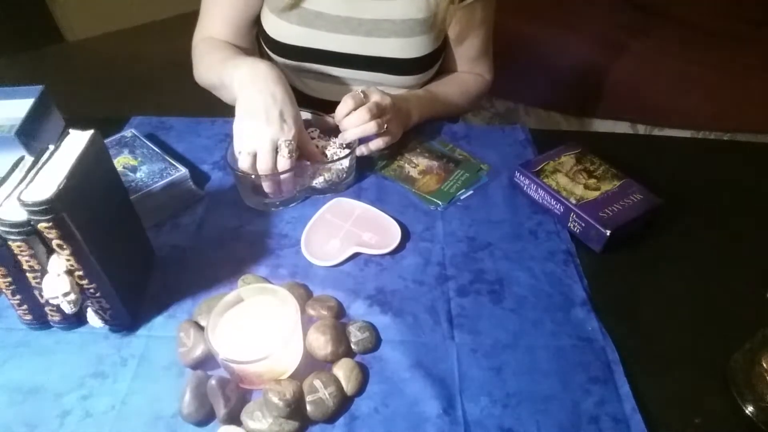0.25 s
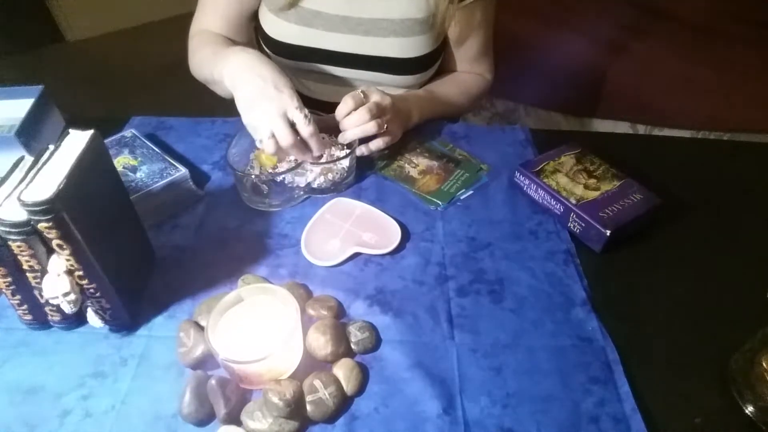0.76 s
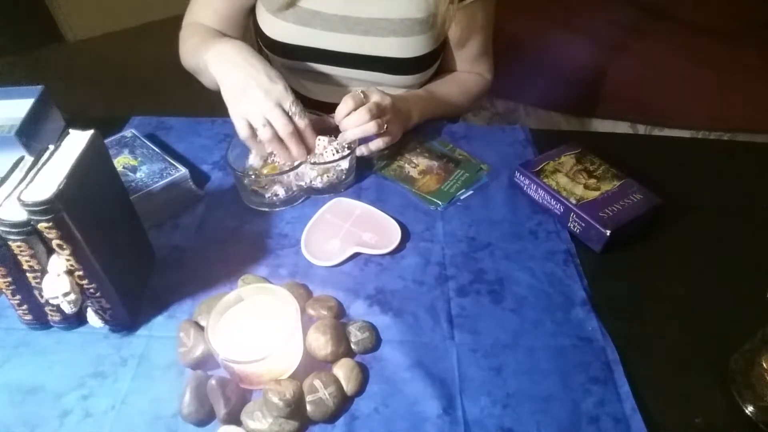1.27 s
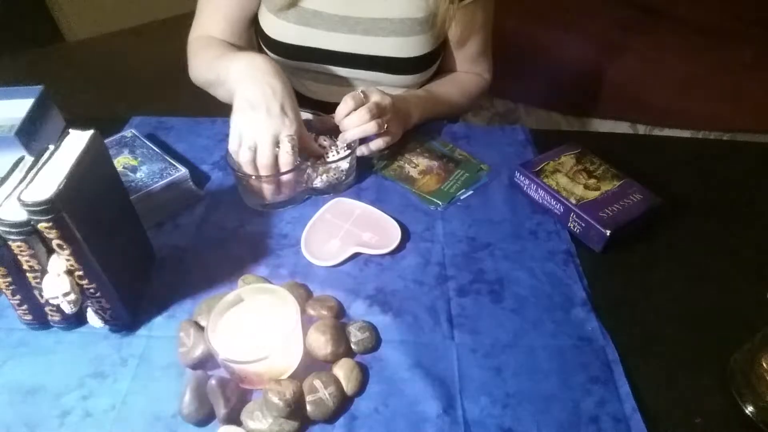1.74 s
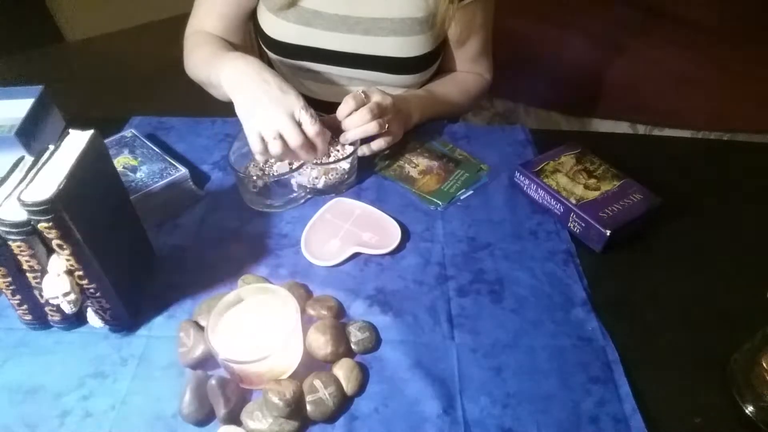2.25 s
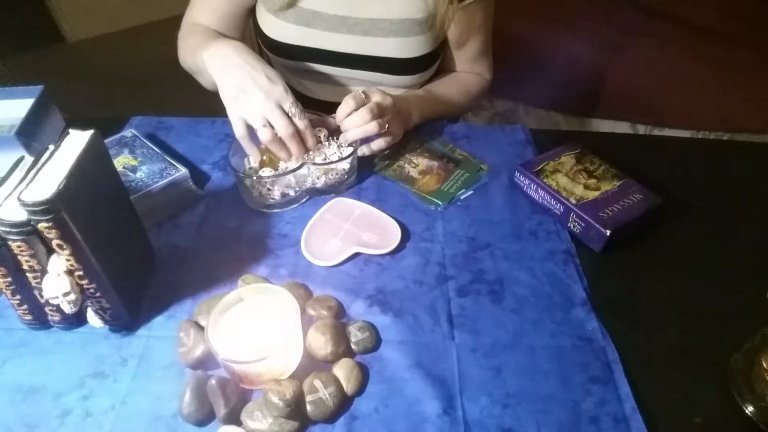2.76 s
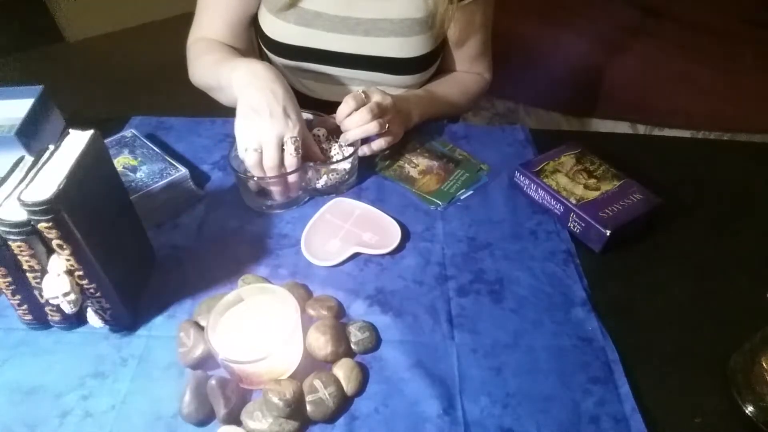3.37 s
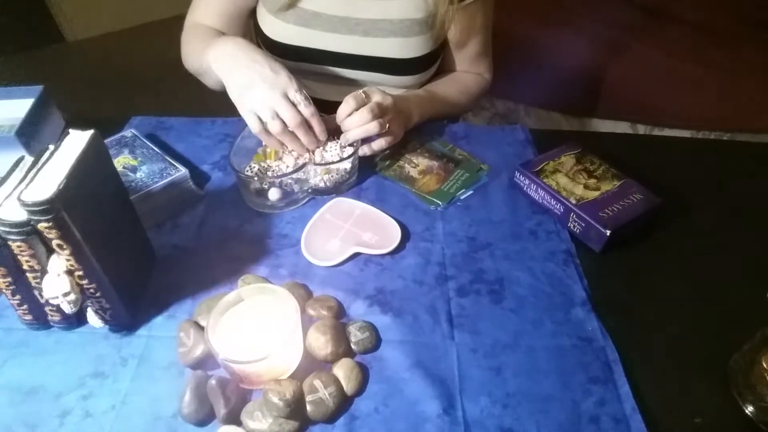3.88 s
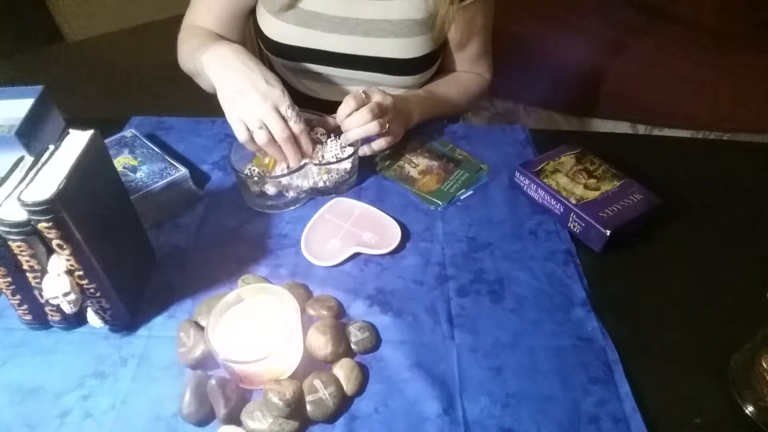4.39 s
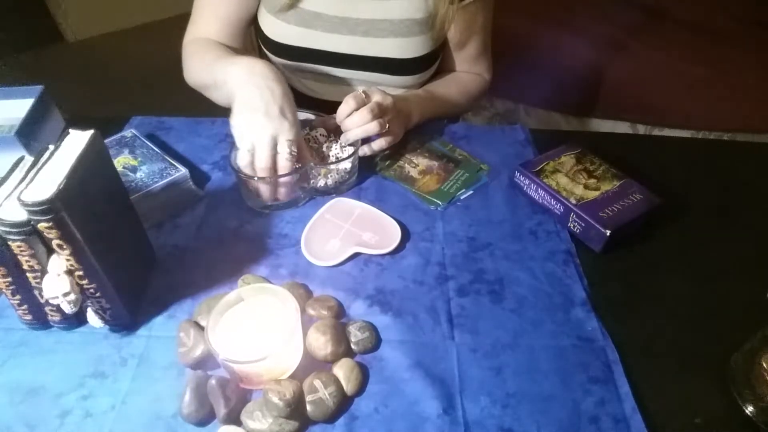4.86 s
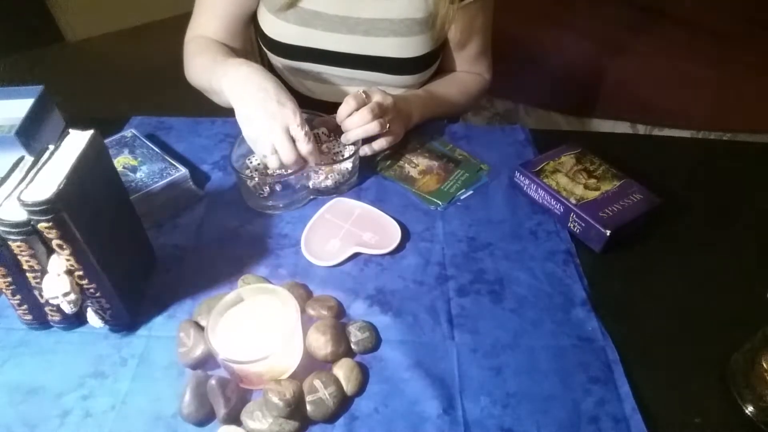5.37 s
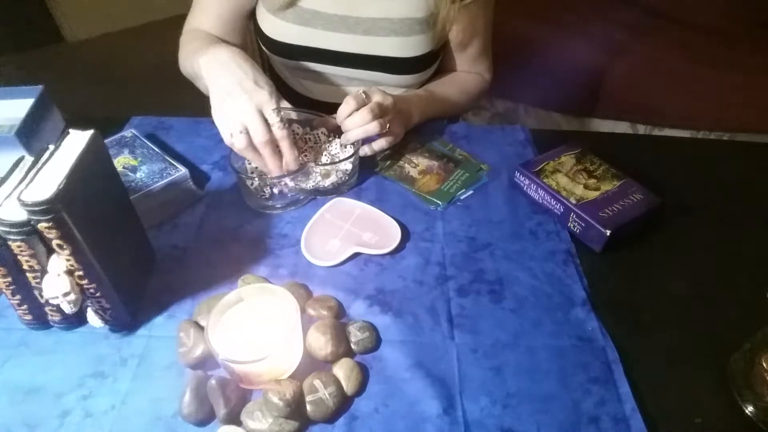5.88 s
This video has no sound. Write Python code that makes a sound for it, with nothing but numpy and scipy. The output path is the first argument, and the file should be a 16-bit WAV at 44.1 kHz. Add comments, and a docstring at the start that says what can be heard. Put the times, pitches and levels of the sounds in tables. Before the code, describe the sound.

In a small quiet room, a hand stirs small metal charms and beads in a glass bowl on a cloth-covered table, heard close in stereo. From the start, a bright, grainy rattle swells and dips with quick finger shoves, full of ticks and light glassy tinks. Harder clinks crack at about 0.3, 0.4 and 0.9 seconds, then at 1.6, just before a short lull near 1.7. Stirring resumes, busy from 2.3 to 3.0 with clustered knocks and low soft bumps of the bowl. It is lighter from 3.2 to 4.1, then brief high squeaks come near 4.2, with strong knocks at 4.3 and 4.5 and a heavy thud. After a thinner moment around 4.7 to 5.1, a sharp clink and thump land at 5.5, and rattling continues to the end just past 6. Rings are short; reflections are dense and the room hush very faint.

```python
"""A small room, a cloth-covered table: a hand stirs small metal charms and beads round a glass bowl.
Two microphones hear tiny contacts fizz, as random clicks ringing the modes of glass and table; loose charms tick
with pitches of their own, beads tink and single charms snap free. Larger pieces knock on the wall, noise cracks
that leave decaying sines; the bowl bumps on the table; metal edges squeak on the glass, as unsteady tones.
Dense reflections and a low hush of filtered noise make the room."""
import sys
import numpy as np
from scipy import signal
from scipy.fft import rfft, irfft, next_fast_len
from scipy.io import wavfile
from scipy.ndimage import uniform_filter1d

SR = 44100
rng = np.random.default_rng(int(sys.argv[2]) if len(sys.argv) > 2 else 0)


def log_audio(samples):
    """Write samples as a 16-bit WAV file to the path given in sys.argv[1]."""
    # one column per channel
    frames = np.atleast_2d(samples).T
    # limit to full scale, then quantise
    limited = np.clip(frames, -1, 1)
    pcm = np.round(limited * 32767).astype(np.int16)
    wavfile.write(sys.argv[1], SR, pcm)


N = 270377  # length [samples]
TAPS = 8192  # length of a response [samples]
HZ = np.fft.rfftfreq(TAPS, 1 / SR)
SIDES = np.array([[.5], [-.5]])  # share of a left-minus-right difference at each microphone
FULL_EFFORT_DB = -26  # reference level at which the hand's effort counts as full

# modes of the glass bowl, nominal:
# (frequency [Hz], width [Hz], height over the dry click [dB], left minus right [dB])
BOWL_MODES = [(1003.4, 34, 16, 0.5), (1127, 50, 12, 10), (1776, 97, 20, -8.5), (1905, 77, 13, -5.5),
              (2434, 360, 10, -2), (2993, 66, 12.5, -1), (3418, 99, 7, 13.5), (3825, 110, 7, -7),
              (4027, 32, 6, -18), (4700, 86, -3, 23), (5220, 81, 4.5, -3), (6020, 103, 2.5, 5),
              (6850, 190, 2.5, -1), (7365, 75, 8.5, -13.5), (7830, 123, 8.5, 8.5), (8800, 150, 4, 7),
              (9210, 31, 4.5, -21), (9600, 58, 5.5, -9), (10930, 340, 12, 7), (11750, 160, 5, -6.5),
              (12340, 340, 15.5, 17)]
# modes of the table under the bowl:
# (frequency [Hz], width [Hz], height over the dry click [dB], left minus right [dB])
TABLE_MODES = [(140, 14, 12, -2.5), (203, 24.4, 11, -13), (228.5, 15.4, 12.5, 5.5), (291.6, 22, 15.5, -10),
               (394.2, 5.6, 18.5, 3), (503.3, 48.5, 12.5, 0.5)]
# lasting ring of the glass, nominal: (frequency [Hz], t60 [s], then the relative level [dB] when struck
# at the end, at the side, at the corner, at the base, at the rim)
GLASS_RING = [(1717, 0.085, -6.5, -30, -34, -5.5, -30), (2945, 0.058, -11, -3.5, -5, -7.5, -3.5),
              (3340, 0.069, 0, -32, -32, -11, -10), (3583, 0.043, 2.5, -35, -25, -11.5, -8),
              (3980, 0.037, -23, -29, -10, 1.5, -0.5), (4983, 0.082, -14, -3.5, 2, -30, -5.5),
              (5230, 0.054, 1.5, -7.5, -8, -3.5, -11), (6030, 0.08, -7, -11.5, -2.5, -10, -15),
              (6840, 0.064, -8, -2, -24, -28, 0.5), (7260, 0.036, -9.5, -11, -18, -31, 2),
              (7700, 0.072, -2, -30, -5, -24, 1.5), (8830, 0.084, -30, -30, -5, -26, -9),
              (9820, 0.21, -15, -23, -19, -22, -7), (10890, 0.048, -7.5, -30, -26, -28, -14)]
# balance of the two microphones: (frequency [Hz], left minus right [dB]); single charms take half of it
MIC_BALANCE = [(50, 1.5), (150, -4.5), (300, 1), (900, -9.5), (1800, 0), (2800, -1.5), (5000, 2), (7200, 3),
               (8500, -8.5), (10200, -9), (13000, -22), (16000, 2.5)]


def amp(db):
    """Gain for a level in dB."""
    return 10 ** (np.asarray(db) / 20)


def evened(x):
    """The same signal at unit RMS level."""
    return x / np.sqrt(np.mean(x ** 2) + 1e-20)


def read(points, hz):
    """Value of a curve at hz, interpolated along a logarithmic frequency axis."""
    f, value = np.transpose(points)
    return np.interp(np.log(hz + 1), np.log(f + 1), value)


def add(mix, s, sound):
    """Lay a sound into the mix at s seconds."""
    part = mix[:, max(round(s * SR), 0):][:, :sound.shape[-1]]
    part += sound[..., :part.shape[1]]


def through(x, response):
    """Sound x as heard through an impulse response at each microphone."""
    return signal.oaconvolve(np.atleast_2d(x), response, axes=1)[:, :N]


def wander(size, hz):
    """Smooth chance of unit size, whose changes fade out above about hz times a second."""
    f = np.fft.rfftfreq(size, 1 / SR)
    return evened(irfft(rfft(rng.standard_normal(size)) / (1 + (f / hz) ** 4), size))


def contacts(per_s, spread_db):
    """Random clicks of either sign; a positive spread makes many small and a few large."""
    size = amp(spread_db * np.minimum(rng.exponential(1, N), 4))
    happens = rng.random(N) < per_s / SR
    return evened(size * rng.choice([-1, 1], N) * happens)


def bump(hz, octaves):
    """A smooth hill of height 1 on the frequency axis."""
    return np.exp(-(np.log2((HZ + 1) / hz) / octaves) ** 2)


def tint(size=170):
    """The uneven colour that one cluster or charm sends to each microphone, of unit spread."""
    ripple = rng.standard_normal((2, len(HZ)))
    smoother = uniform_filter1d(ripple, size, mode="wrap")
    return evened(uniform_filter1d(smoother, size // 2, mode="wrap"))


def hollows(hz):
    """Gain in dB of the bowl as a radiator: between its modes it passes less sound."""
    # (frequency [Hz], width [Hz], depth [dB])
    mode_gaps = [(2230, 420, -2.5), (4250, 180, -2.5), (5650, 280, -1.5), (6360, 220, -2)]
    return sum(db / (1 + (2 * (hz - f) / width) ** 2) for f, width, db in mode_gaps)


def body(colour, modes, extra_db=0., unlike_db=0., detune=0.):
    """Causal stereo response of unit energy: a dry click with resonances that vary with spot struck and load."""
    spot_db = unlike_db * rng.uniform(-1, 1, (len(modes), 2, 1))
    shifts = 1 + detune * rng.uniform(-0.85, 1, len(modes))
    power = 1
    for (f, width, db, lean), spot, shift in zip(modes, spot_db, shifts):
        power = power + amp(db + spot + lean * SIDES) ** 2 / (1 + (2 * (HZ - f * shift) / width) ** 2)
    colour_db = read(colour, HZ) + read(MIC_BALANCE, HZ) * SIDES + hollows(HZ) + extra_db
    log_gain = np.log(np.sqrt(power) * amp(colour_db))
    # minimum phase: the Hilbert transform of the log gain gives the phase of a causal response
    circle = np.concatenate([log_gain, log_gain[:, -2:0:-1]], axis=1)
    response = np.fft.ifft(np.exp(np.conj(signal.hilbert(circle)))).real[:, :TAPS // 2]
    return response / np.sqrt(np.sum(response ** 2) / 2)


def rebounds(gap_s, keep, contact_s, count=5):
    """One blow and its ever weaker, mostly quicker rebounds, each a brief noisy crack; unit energy."""
    t = np.arange(TAPS // 4) / SR
    waits = gap_s * .8 ** np.arange(count) * rng.uniform(.6, 1.4, count)
    shape = np.zeros(len(t))
    for k, s in enumerate(np.cumsum(waits) - waits):
        shape += np.clip(keep, 0, .9) ** k * (t >= s) * np.exp(-abs(t - s) / contact_s)
    noise = rng.standard_normal(len(t)) + .5 * rng.standard_normal((2, len(t)))
    cracks = shape * noise
    return cracks / np.linalg.norm(cracks, axis=1, keepdims=True)


def ping(hz, t60):
    """One small charm struck: two inharmonic partials, quickly damped."""
    t = np.arange(TAPS // 4) / SR
    overtone_hz = hz * rng.uniform(1.15, 1.7)
    tone = 0
    for f, db in ((hz, 0), (overtone_hz, -4)):
        level = amp(db - 60 * t / t60 + read(MIC_BALANCE, f) * SIDES / 2)
        tone = tone + level * np.sin(2 * np.pi * (f * t + SIDES * rng.uniform(-.6, .6)))
    return tone


def ring(modes, rise_s=0.003):
    """The glass rings on after a blow; each mode reaches the microphones with its own phase."""
    t = np.arange(TAPS) / SR
    tones = 0
    for hz, t60, db in modes:
        level = amp(db - 60 * t / t60 + read(MIC_BALANCE, hz) * SIDES)
        cycles = hz * t + rng.random() + SIDES * rng.uniform(-.3, .3)
        tones = tones + level * np.sin(2 * np.pi * cycles)
    return np.minimum(t / rise_s, 1) * tones


def stroke(start, length, rise_s, settle_db_per_s, sag_db_per_s=0):
    """Gain of one movement: the charms get going, keep moving while pushed, then settle."""
    t = np.maximum(np.arange(N) / SR - start, 0)
    fall_db = sag_db_per_s * t + settle_db_per_s * np.maximum(t - length, 0)
    return np.minimum(t / rise_s, 1) * amp(-fall_db)


def hand(follow=1, scraping=0, bearing=0):
    """Gain over time of a layer that follows the hand's effort, scraping and bearing down by the given amounts."""
    # sweeps round the bowl, with a short rest between them: (start [s], length [s], relative level [dB])
    sweep_list = [(-.1, 0.086, -36), (0.07, 1.582, -43), (1.719, 1.34, -41.5), (3.309, 0.66, -40.5),
                  (4.041, 0.626, -46), (4.808, 1.19, -43)]
    # fingers shoving the heap during a sweep: (start [s], length [s], relative level [dB],
    # scraping on the glass [dB, scaled by scraping], bearing down on the table [dB, scaled by bearing])
    shove_list = [(0.168, 0.11, -33, -1.5, 2), (0.327, 0.11, -32, -0.5, -4.5), (0.475, 0.11, -38.5, 1, 1.5),
                  (0.65, 0.023, -41, -18, -18), (0.754, 0.17, -33, -1.5, 0.5), (0.88, 0.094, -34.5, 1, 2.5),
                  (0.978, 0.15, -39, 0.5, -15), (1.185, 0.063, -34, 0.5, -2),
                  (1.283, 0.23, -30.5, -1.5, -3), (1.752, 0.11, -35, 0, 0.5), (1.93, 0.1, -37, 0.5, -1.5),
                  (2.05, 0.055, -30.5, -0.5, -4.5), (2.13, 0.19, -36.5, -2, -9),
                  (2.383, 0.17, -33.5, -3, 2), (2.729, 0.22, -31, 0, -2.5), (2.883, 0.16, -30, -1.5, -0.5),
                  (3.074, 0.046, -37, -0.5, 1), (3.378, 0.22, -36.5, -1.5, -6),
                  (3.537, 0.18, -33.5, 0.5, -9), (3.747, 0.14, -37, -3, 0), (3.964, 0.034, -41, 1, -1),
                  (4.148, 0.097, -40.5, -0.5, -11), (4.286, 0.32, -37, -0.5, -0.5),
                  (4.425, 0.07, -31, -1, 2), (4.487, 0.14, -38.5, 0.5, 7), (4.821, 0.025, -52, 4.5, 14.5),
                  (4.897, 0.071, -36.5, -1, 1), (5.14, 0.025, -39.5, 2.5, 3.5),
                  (5.257, 0.16, -36.5, -5, -7), (5.496, 0.15, -34, -1, 6.5),
                  (5.77, 0.12, -33.5, -0.5, -1.5), (6.008, 0.15, -31.5, -2.5, -3)]
    moves = []
    for s, length, db in sweep_list:
        moves.append(amp(db - FULL_EFFORT_DB) * stroke(s, length, rise_s=0.093, settle_db_per_s=350))
    for s, length, db, scrape_db, down_db in shove_list:
        shape = stroke(s, length, rise_s=0.017, settle_db_per_s=225, sag_db_per_s=9.5)
        moves.append(amp(db - FULL_EFFORT_DB + scraping * scrape_db + bearing * down_db) * shape)
    return amp(FULL_EFFORT_DB) * np.linalg.norm(moves, axis=0) ** follow


def hush(level_db=-56, apart=0.065):
    """The low, steady air of the room: coloured noise, almost the same at both microphones."""
    # (frequency [Hz], relative level per Hz [dB])
    air_colour = [(15, -36), (50, -3), (90, -16.5), (130, 2.5), (250, -83), (600, -30), (2000, -32),
                  (8000, -67), (16000, -58)]
    hz = np.fft.rfftfreq(N, 1 / SR)
    noise = rng.standard_normal(N) + apart * rng.standard_normal((2, N))
    gain = amp(read(air_colour, hz) + read(MIC_BALANCE, hz) * SIDES)
    return amp(level_db) * evened(irfft(rfft(noise) * gain, N))


def heap(count=10):
    """Clusters across the bowl slip in turn, each with its own colour and path; together they shake the table."""
    # dry contacts sliding, pressed on the glass, and pushed on the table:
    # (frequency [Hz], relative level per Hz [dB])
    slide_colour = [(1500, -102), (4000, 10.5), (7000, 17.5), (8500, 13), (10200, 3.5), (12500, 2.5),
                    (14800, 21.5), (15700, 13.5)]
    press_colour = [(350, -46), (750, -13), (1050, -9.5), (1400, -14), (2200, -14), (3000, -4),
                    (4300, -7.5), (4900, 1.5), (6200, 1.5), (7200, 1.5), (8400, -8), (11000, -16),
                    (16000, -26)]
    push_colour = [(30, -20.5), (60, -5), (100, -9), (135, -4), (240, -3.5), (340, -4.5), (450, -6),
                   (620, -8), (800, -19.5), (1100, -15), (1800, -29.5), (5000, -76)]
    slips, out = wander(N, hz=45), np.zeros((2, N))
    avalanche = amp(1.1 * slips)
    sliding = hand() * avalanche * amp(0.3)
    pressing = hand(follow=0.96, scraping=3.4) * avalanche * amp(-3.5)
    for lag in np.arange(count) % 5 - 2:
        turn = evened(amp(5 * wander(next_fast_len(N), hz=22)[:N])) / np.sqrt(count)
        slide = contacts(per_s=420, spread_db=2.6) * sliding * turn
        press = contacts(per_s=130, spread_db=2.4) * pressing * turn
        for taps, colour in (slide, slide_colour), (press, press_colour):
            glass = body(colour, BOWL_MODES, extra_db=2 * tint(), unlike_db=5, detune=.016)
            # the lag between the microphones, in samples, places the cluster
            out += through([np.roll(taps, lag), taps], glass)
    bearing_down = hand(follow=0.69, scraping=0.56, bearing=0.98)
    push = contacts(per_s=450, spread_db=-2.5) * bearing_down * avalanche * amp(-8.5)
    # the push also stirs the lowest modes of the glass
    return out + through(push, body(push_colour, TABLE_MODES + BOWL_MODES[:4]))


def charms(per_s=230, low_hz=3200, high_hz=13000, level_db=-5.0, count=48):
    """Loose charms tumble, more often and harder as the hand pushes; each has its own tick, rebound and
    pitch, quickly damped by its neighbours."""
    # (frequency [Hz], relative level per Hz [dB])
    tick_colour = [(300, -40), (2000, -24), (4000, 3), (7000, -14), (9000, 8), (12000, -0.5), (15000, 3)]
    out, owner = np.zeros((2, N)), rng.integers(0, count, N)
    effort = hand(scraping=0.67) / amp(FULL_EFFORT_DB)
    hits = contacts(per_s * effort, spread_db=3.2) * np.sqrt(effort)
    for k in range(count):
        hz = low_hz * (high_hz / low_hz) ** ((k + rng.random()) / count)
        tone = ping(hz, rng.uniform(.012, .045))
        blow = rebounds(gap_s=.004, keep=.45, contact_s=.0003)
        tick = through(blow, body(tick_colour, BOWL_MODES, extra_db=3 * tint(), unlike_db=7))
        dry_part = tick[:, :tone.shape[1]] / np.linalg.norm(tick)
        pitched_part = amp(hollows(hz)) * tone / np.linalg.norm(tone)
        out += through(hits * (owner == k), dry_part + pitched_part)
    return evened(out) * np.sqrt(np.mean(effort ** 2)) * amp(FULL_EFFORT_DB + level_db)


def tinks(per_s=55, level_db=-9.5, count=20):
    """Beads touch the wall lightly, each at a spot that picks out a few of the glass's modes."""
    out, spot = np.zeros((2, N)), rng.integers(0, count, N)
    hits = contacts(per_s, spread_db=2.6)
    for k in range(count):
        modes = []
        for hz, t60, *_ in GLASS_RING[1:-3]:
            # slightly detuned, shorter than after a knock
            modes.append((hz * rng.uniform(.988, 1.012), .7 * t60, rng.uniform(-30, 0)))
        out += through(hits * (spot == k), evened(ring(modes, rise_s=.0002)))
    return evened(out) * hand(scraping=2.0) * amp(level_db)


def bumps(level_db=27, hollow_hz=515, hollow_width_hz=30, hollow_height_db=11):
    """The shifting heap rocks the bowl, which thuds through the cloth into the table and sounds its lowest modes."""
    # (time [s], relative level [dB], hollow middle tone [dB, halved for its resonance])
    bump_list = [(0.098, -47, 9), (0.159, -35, 7), (0.201, -33, 2), (0.228, -36, 5), (.262, -42, -6),
                 (0.515, -44, 12), (0.584, -45, 7), (0.797, -40, -16), (0.844, -39, -4), (0.887, -42, 4),
                 (0.932, -33, 5), (.955, -41, -2), (1.202, -47, 2), (1.322, -35.5, -14), (1.482, -44, 15),
                 (1.797, -37, -6), (2.072, -46, -12), (2.321, -37.5, -11), (2.401, -37, -11),
                 (2.433, -40, -9), (2.513, -41, 2), (2.631, -38, -8), (2.66, -40, -9), (2.755, -32, -10),
                 (2.782, -37.5, -8), (2.909, -37.5, -2), (2.941, -41, -3), (3.015, -41, 20),
                 (3.093, -40, -9), (3.297, -40, -2), (3.361, -39, 8), (3.42, -35.5, -4), (3.673, -40, 3),
                 (3.892, -43, -17), (3.93, -42.5, -4), (4.311, -38.5, -31), (4.52, -30.5, 1),
                 (4.534, -28, -3), (4.592, -49, 2), (4.777, -45, 2), (4.804, -43.5, -2), (4.834, -38.5, 15),
                 (4.888, -55, -3), (4.949, -41.5, -1), (5.228, -46, -2), (5.516, -30.5, -4),
                 (5.562, -28, -15), (5.631, -40, 7), (5.747, -37.5, -15), (6.075, -44, -15)]
    # (frequency [Hz], relative level per Hz [dB])
    thud_colour = [(40, -34), (105, -4), (135, 1), (170, -2.5), (240, -1), (330, -3.5), (550, -4.5),
                   (750, -15.5), (1000, -10.5), (1400, -17), (2500, -59.5)]
    out = np.zeros((2, N))
    for s, db, hollow_db in bump_list:
        hollow_mode = (hollow_hz, hollow_width_hz, hollow_height_db + hollow_db / 2, 0)
        modes = TABLE_MODES + BOWL_MODES[:2] + [hollow_mode]
        thud = body(thud_colour, modes, hollow_db * bump(hollow_hz, octaves=0.46))
        add(out, s, amp(db + level_db) * thud)
    return out


def knocks(piece_db=19, piece_width_hz=190, clink_db=7.5, ring_db=-18.0, clack_hz=1780):
    """A larger piece cracks against the wall and rebounds; the spot struck decides which modes ring on."""
    # (time [s], relative level [dB], spot struck, low clack of the glass [dB], treble [dB], relative ring [dB])
    knock_list = [(0.0984, -23.5, "base", 15, 13, -10), (0.1984, -16, "rim", -3, 0, -12),
                  (0.273, -9, "rim", 4, 12, -9), (0.4166, -5, "end", 3, 10, 1.5),
                  (0.4515, -16, "rim", -12, 16, -5), (0.5166, -12.5, "side", 0, -5, -10),
                  (0.625, -16, "end", 6, 6, 1), (0.932, -3.5, "side", -8, -29, 5),
                  (0.9343, -17, "rim", -10, -12, -9), (0.949, -11, "corner", -8, -15, -3),
                  (1.103, -14.5, "rim", 1, 14, -4), (1.2018, -21, "end", 6, 5, 4.5),
                  (1.531, -15, "side", -7, -3, 0), (1.5833, -11.5, "base", -0.5, -13, -13),
                  (1.6053, -2, "corner", -18, -2, -4.5), (1.6203, -11, "corner", -14, -6, -6),
                  (2.284, -9.5, "rim", -10, 14, -6.5), (2.3994, -12, "base", 3, -10, -1),
                  (2.4061, -7.5, "base", -2, -9, 1), (2.5283, -14, "base", -4, -28, -1.5),
                  (2.5563, -12, "corner", -13, -7, -7), (2.5881, -17.5, "base", 2.5, 0, 4.5),
                  (2.6582, -11.5, "base", 7, -16, -9), (2.701, -19.5, "base", 14, -13, 3),
                  (2.75, -12, "end", 11, 7, 3), (2.763, -6, "corner", 7, 11, -5),
                  (2.9096, -10, "corner", 5.5, -12, -1), (2.916, -11, "side", 5, -8, -4),
                  (3.1103, -12.5, "base", -6.5, 3, -14), (3.2971, -20, "base", 8, 0, -3),
                  (3.362, -22, "base", 7, 4, -11), (3.628, -17, "base", 5, 3, 3),
                  (3.643, -21, "corner", -6, 2, 1), (3.7175, -17.5, "side", 12, -2, -9),
                  (3.894, -15.5, "base", 8, 5, 8), (3.903, -15, "end", 10, -10, 2),
                  (4.159, -20, "base", 3, 9, 1), (4.201, -17.5, "rim", 0, 10, -2),
                  (4.2254, -14, "end", 3, 5, -5.5), (4.297, -4, "end", -7, 7, -0.5),
                  (4.5184, -4, "side", -1, -28, 6), (4.523, -16, "corner", -1, -20, -5),
                  (4.777, -19.5, "base", 4, -16, 0), (4.8041, -17.5, "base", 1, -4.5, -3),
                  (4.8383, -25, "end", 20, -2, 5), (5.2297, -13.5, "rim", -11, 2, -2),
                  (5.516, -3.5, "rim", 3, 6, -12), (5.6331, -16, "rim", 2, 6, -3),
                  (5.7318, -22, "base", 13, -3, -5), (5.8185, -17, "base", 20, 14, -13),
                  (5.8565, -13.5, "end", 9, -1, -7.5), (6.1042, -13.5, "rim", -5, -6, 8)]
    # spots on the bowl, in the order of the ring levels: (name)
    spot_names = ["end", "side", "corner", "base", "rim"]
    # (frequency [Hz], relative level per Hz [dB])
    clink_colour = [(200, 2.5), (700, -7), (1400, -6), (2300, -2), (3300, -6.5), (5000, 1.5), (7500, 7.5),
                    (9000, -2), (16000, -14.5)]
    out = np.zeros((2, N))
    treble = np.clip((HZ - 7800) / 2500, 0, 1)
    for s, db, spot, clack_db, high_db, lasting_db in knock_list:
        modes = [(hz, t60, levels[spot_names.index(spot)]) for hz, t60, *levels in GLASS_RING]
        blow = rebounds(gap_s=.0042, keep=.42, contact_s=.0011)
        colour_db = bump(clack_hz, octaves=0.58) * clack_db + treble * high_db
        # while the piece still touches the wall, the modes are damped and broad
        damped = [(hz, piece_width_hz, piece_db + mode_db, 0) for hz, _, mode_db in modes]
        clink = through(blow, body(clink_colour, BOWL_MODES + damped, colour_db))
        add(out, s, amp(db + clink_db) * clink)
        add(out, s, amp(db + ring_db + lasting_db) * ring(modes))
    return out


def clicks(level_db=-2, t60=0.017):
    """Single charms snap free of the heap, each a short two-partial ping."""
    # (time [s], relative level [dB], pitch [Hz])
    click_list = [(0.6793, -24.5, 6600), (0.809, -22, 7440), (0.863, -22, 6700), (1.057, -27, 7620),
                  (1.6556, -22.5, 8910), (2.1819, -21.5, 7100), (2.2994, -25, 8930), (2.4486, -25, 7600),
                  (3.0194, -32, 4960), (3.9894, -34, 5130), (4.0582, -33.5, 5800), (4.152, -25, 9500),
                  (4.4573, -23, 7200), (4.579, -18.5, 6800), (5.1602, -27, 6740), (5.7965, -20, 9800),
                  (6.056, -20, 7200)]
    out = np.zeros((2, N))
    for s, db, hz in click_list:
        add(out, s, amp(db + level_db) * ping(hz, t60))
    return out


def squeaks(level_db=-1):
    """Stick and slip holds one mode singing, unevenly, while a metal edge drags on the glass."""
    # (time [s], length [s], pitch [Hz], relative level [dB], unsteadiness of the pitch [Hz])
    squeak_list = [(1.027, 0.029, 14300, -37, 70), (1.095, 0.054, 10400, -47, 50),
                   (1.1, 0.11, 11300, -51, 58), (1.655, 0.017, 15260, -24, 97),
                   (2.27, 0.13, 13900, -49, 160), (2.57, 0.031, 9400, -46, 40),
                   (2.366, .028, 15650, -30, 70), (3.786, 0.066, 14000, -41, 110),
                   (3.8, 0.086, 2944, -41, 14), (1.61, 0.041, 13720, -44, 50),
                   (4.153, 0.026, 14200, -33, 90), (4.172, 0.06, 15400, -23, 31),
                   (4.195, 0.016, 15000, -24, 30), (4.28, 0.024, 15100, -27, 81),
                   (4.595, 0.026, 15220, -38, 50), (5.235, 0.068, 2690, -49, 130),
                   (5.305, 0.087, 2910, -50, 150), (5.37, .075, 3020, -50, 120),
                   (5.532, 0.106, 2917, -46.5, 25), (5.776, 0.066, 2994, -44, 39),
                   (5.281, 0.021, 6640, -38, 62)]
    out = np.zeros((2, N))
    for s, length, hz, db, waver_hz in squeak_list:
        size = int(length * SR)
        pitch = hz + waver_hz * wander(TAPS, hz=245)[:size]
        grip = amp(3 * wander(TAPS, hz=150)[:size]) * signal.windows.tukey(len(pitch), .3)
        tone = evened(grip * np.sin(2 * np.pi * np.cumsum(pitch) / SR))
        add(out, s, tone * amp(db + level_db + read(MIC_BALANCE, hz) * SIDES))
    return out


def room(x, gap_s=0.0044):
    """Direct sound, a sample earlier at the right microphone, and dense reflections that die band by band."""
    # (frequency [Hz], time to fall by 70 dB [s])
    decay_times = [(150, 0.45), (500, 0.27), (1300, 0.15), (3500, 0.27), (9000, 0.23), (15000, 0.14)]
    # (frequency [Hz], tail against the direct sound [dB])
    tail_levels = [(150, 1), (600, -5.5), (2000, 3), (6000, -2.5), (14000, 2.5)]
    size = SR // 2
    arrives = (rng.random((2, size)) < .12) * (np.arange(size) > gap_s * SR)
    taps = rng.choice([-1., 1.], (2, size)) * arrives
    hz, t, z = signal.stft(taps, SR, nperseg=256)
    decay = 0.00032 ** (t / read(decay_times, hz)[:, None])  # 0.00032 is -70 dB
    decay *= amp(read(tail_levels, hz))[:, None] / np.sqrt(np.mean(decay ** 2, axis=1, keepdims=True))
    tail = signal.istft(z * decay, SR, nperseg=256)[1] / np.linalg.norm(taps[0])
    direct = np.array([np.roll(x[0], 1), x[1]])
    return direct + through(x, tail)


def scene():
    """The stirred bowl heard in the room, over the room's hush."""
    stirring = heap() + charms() + tinks()
    strikes = bumps() + knocks() + clicks()
    return room(stirring + strikes + squeaks()) + hush()


def record(dry, edge_hz=15780):
    """The recorder's bass roll-off and band limit."""
    dry = signal.sosfilt(signal.butter(2, 38, "highpass", fs=SR, output="sos"), dry)
    band_limit = signal.firwin(1023, edge_hz, window=("kaiser", 9), fs=SR)
    return signal.oaconvolve(dry, band_limit[None], "same")


dry = scene()
out = record(dry)
log_audio(out)
```